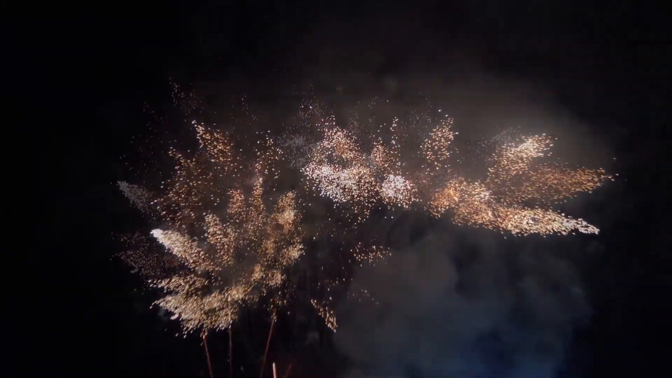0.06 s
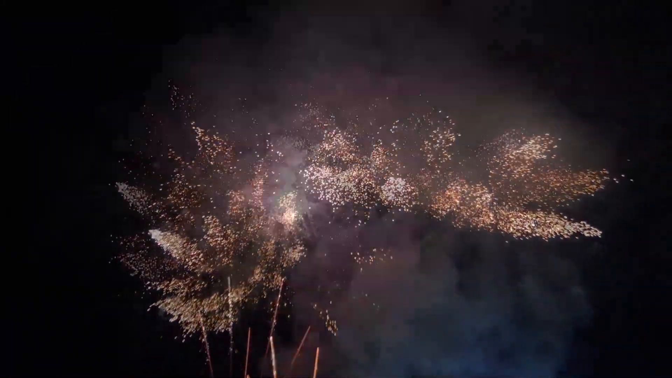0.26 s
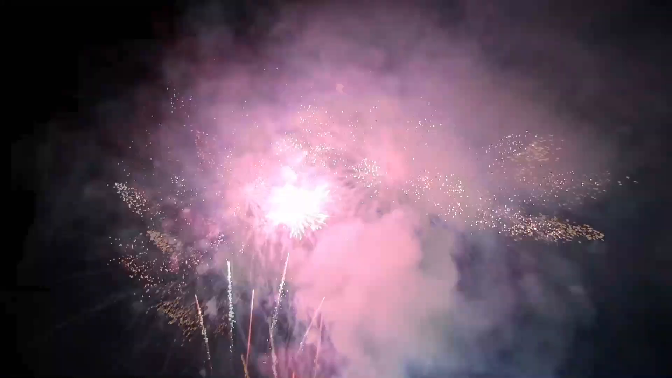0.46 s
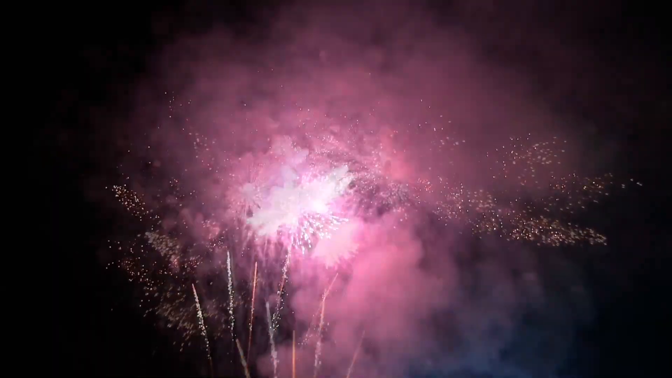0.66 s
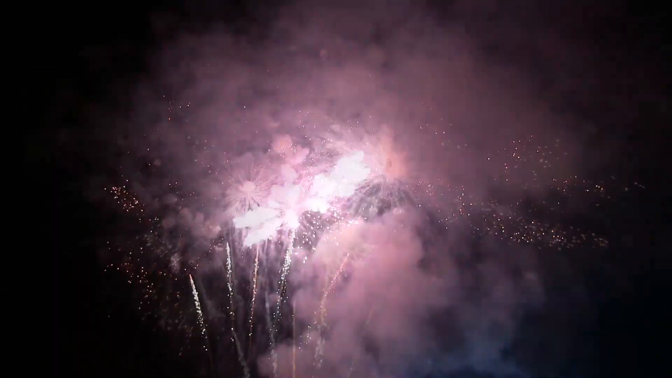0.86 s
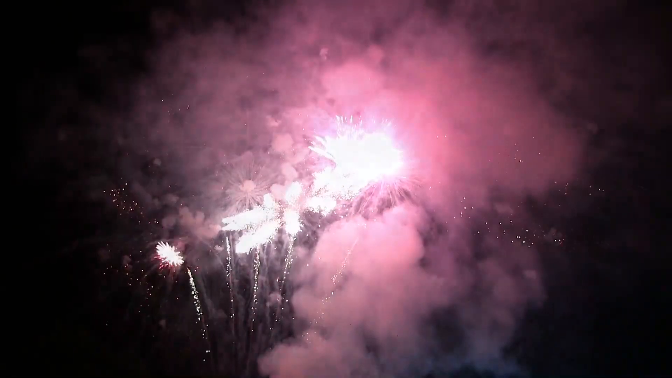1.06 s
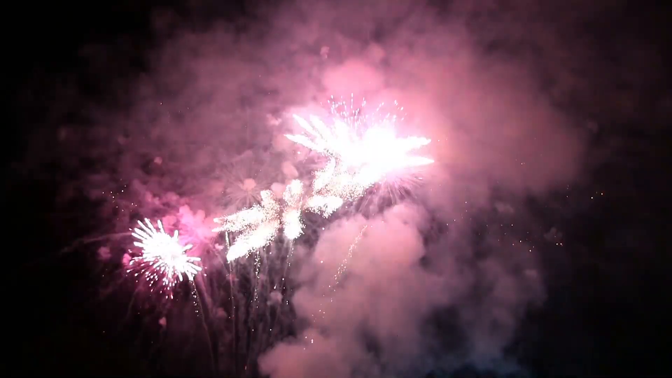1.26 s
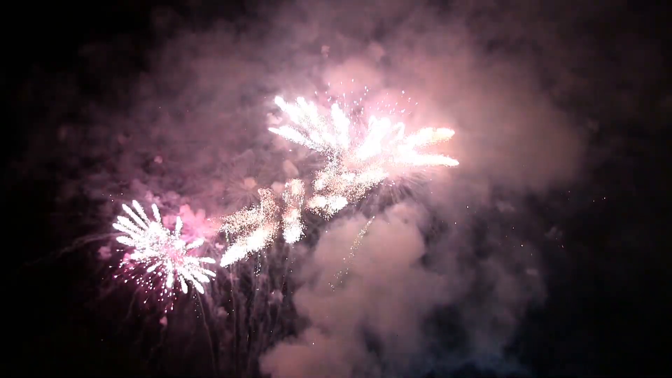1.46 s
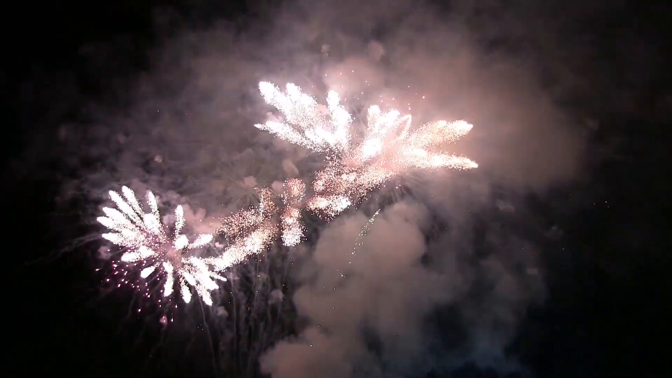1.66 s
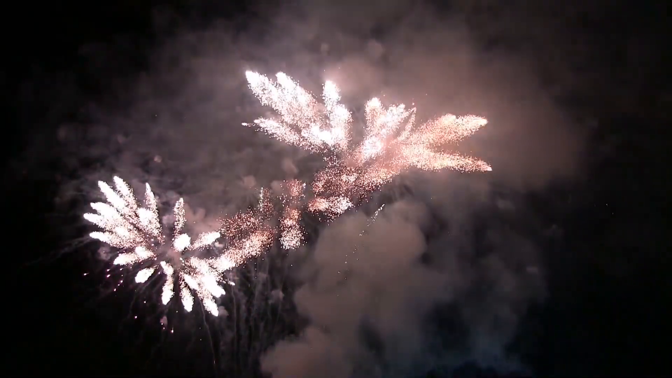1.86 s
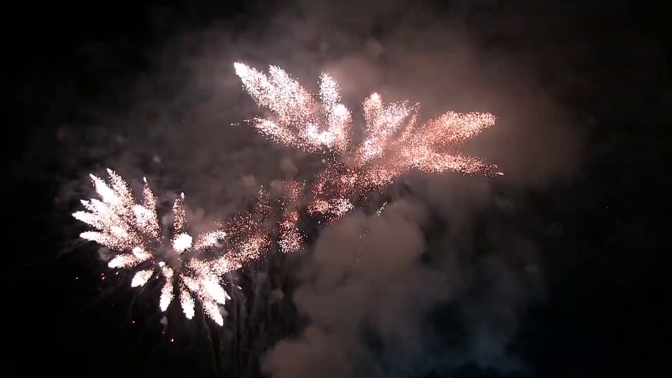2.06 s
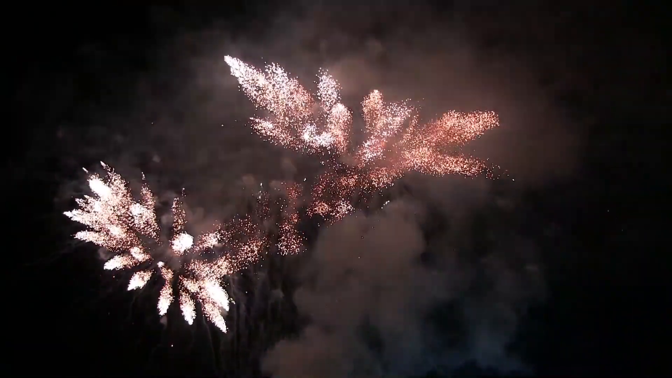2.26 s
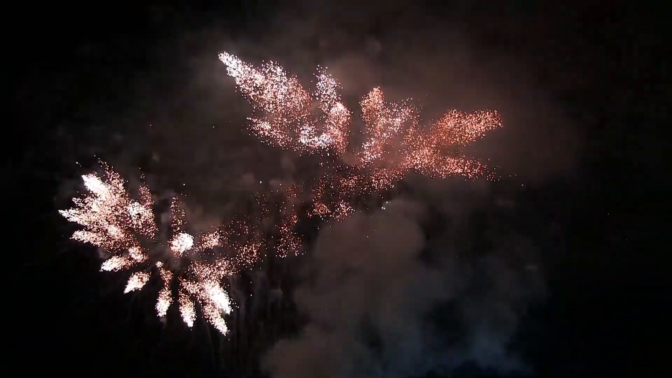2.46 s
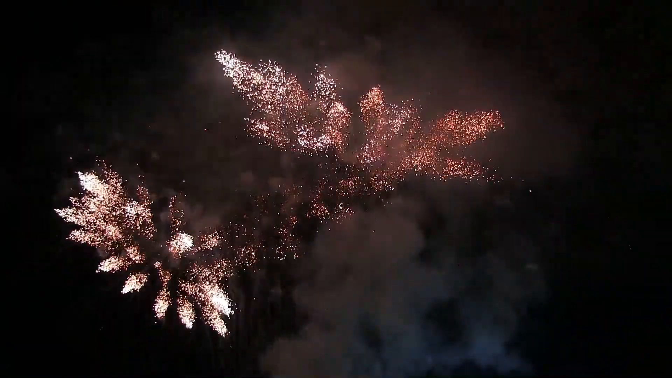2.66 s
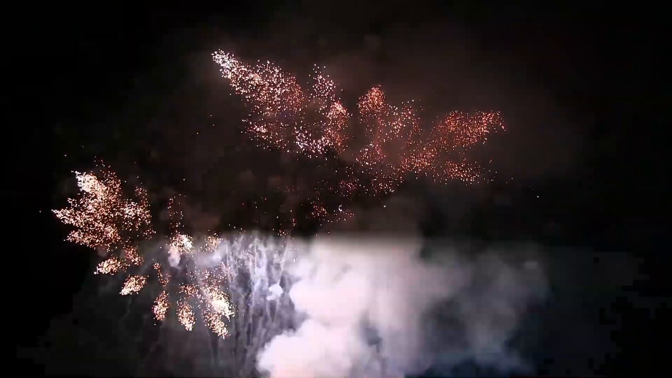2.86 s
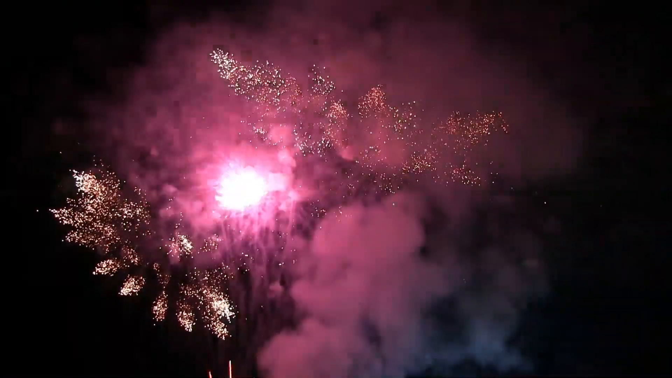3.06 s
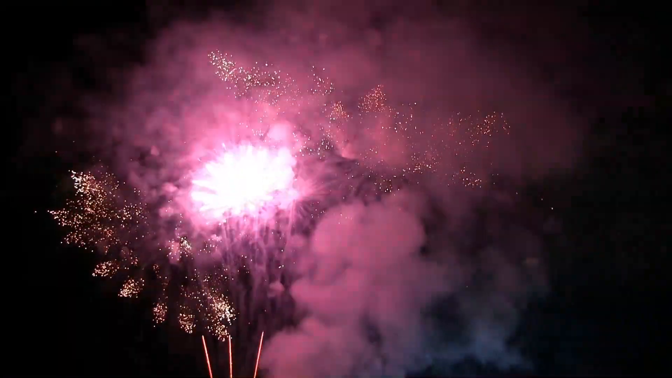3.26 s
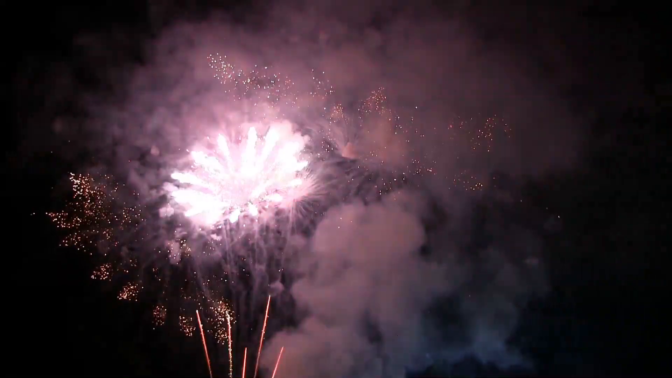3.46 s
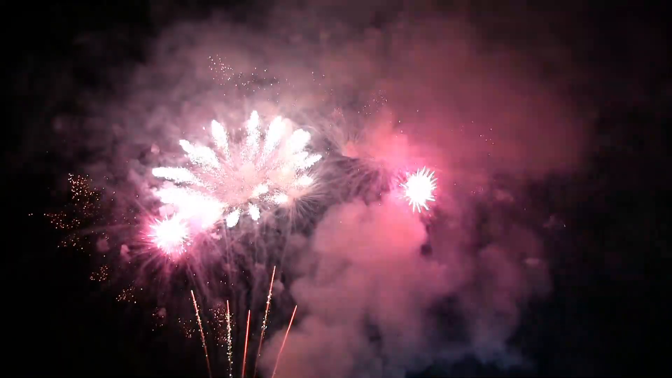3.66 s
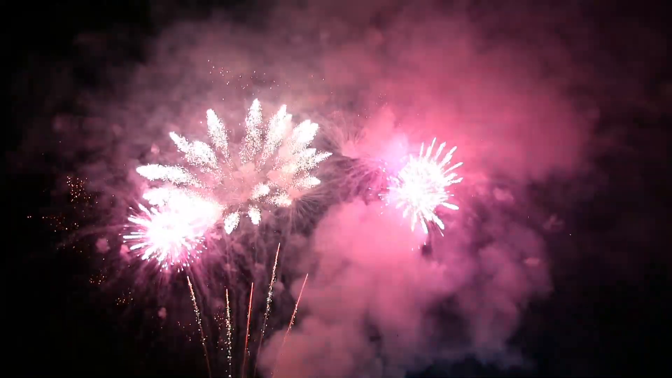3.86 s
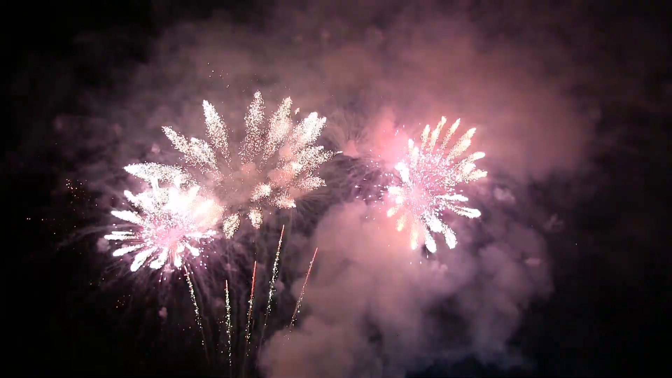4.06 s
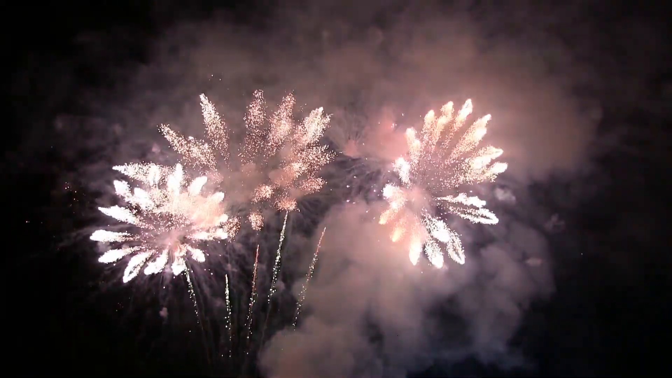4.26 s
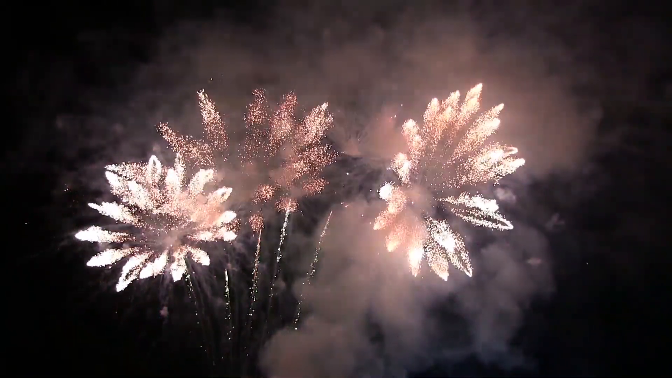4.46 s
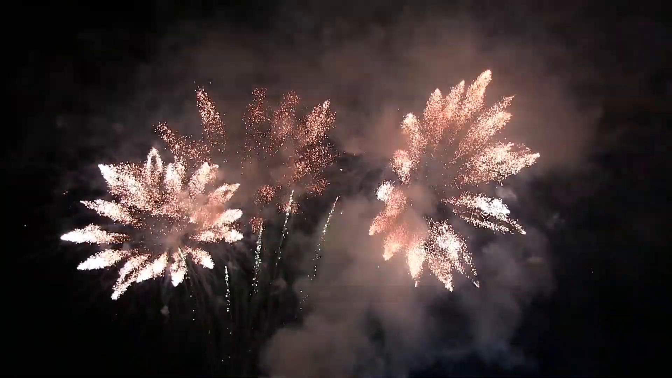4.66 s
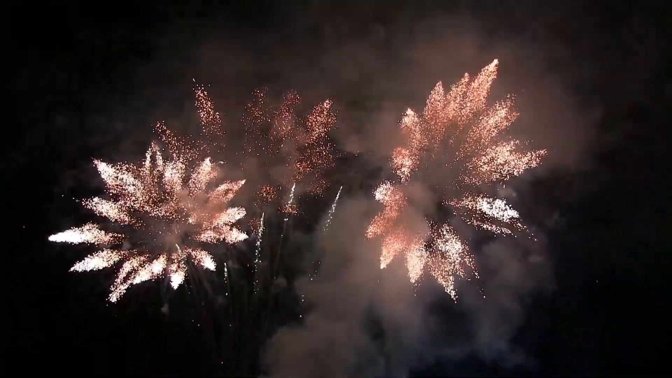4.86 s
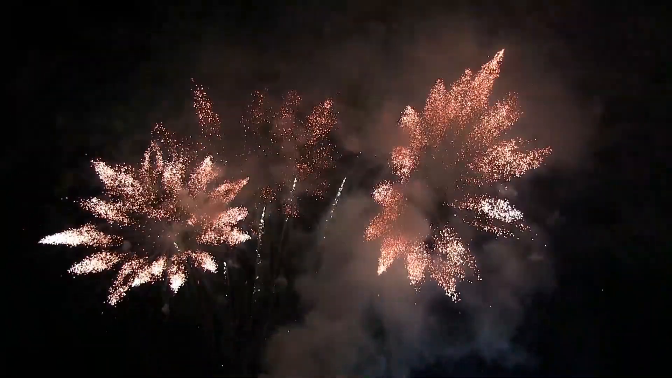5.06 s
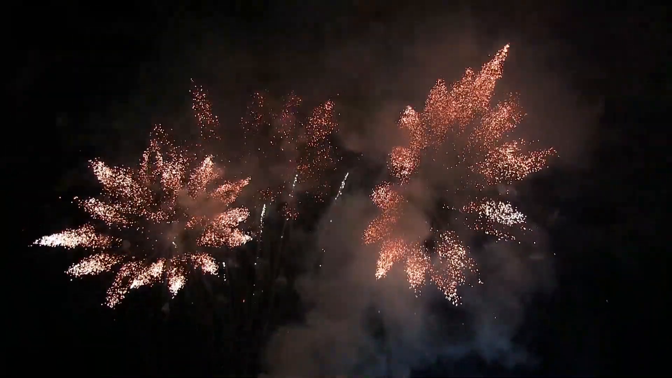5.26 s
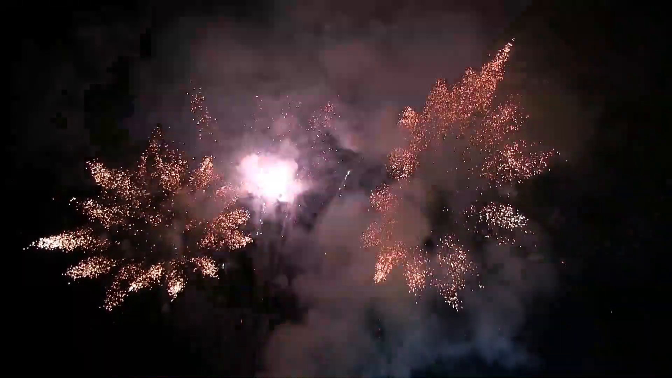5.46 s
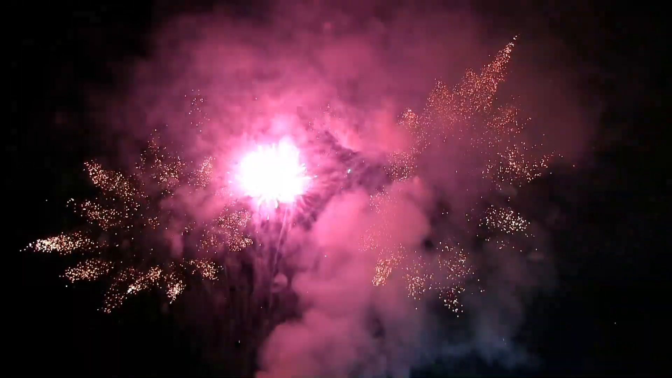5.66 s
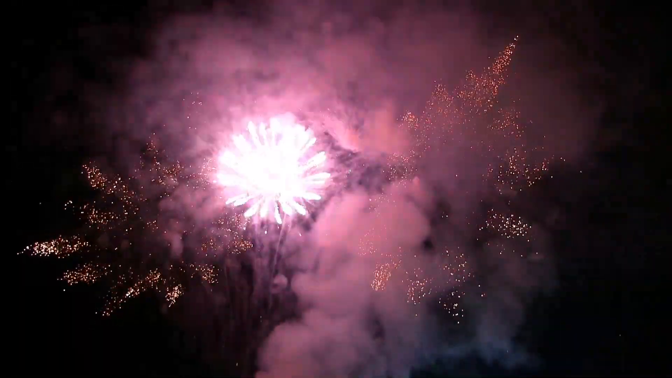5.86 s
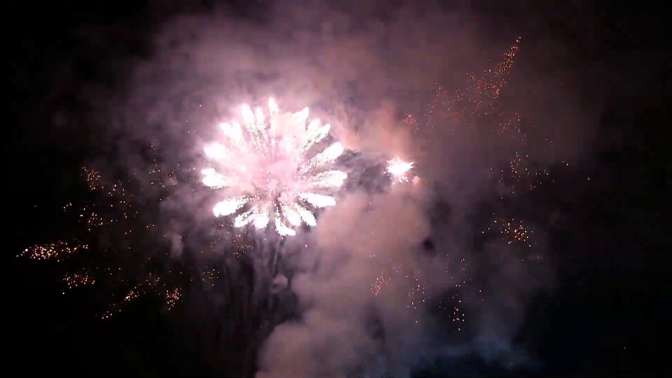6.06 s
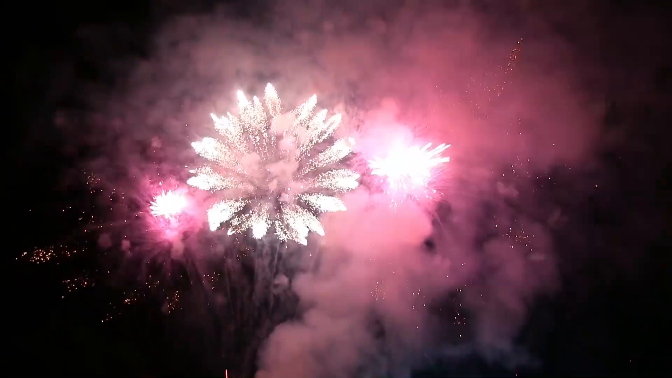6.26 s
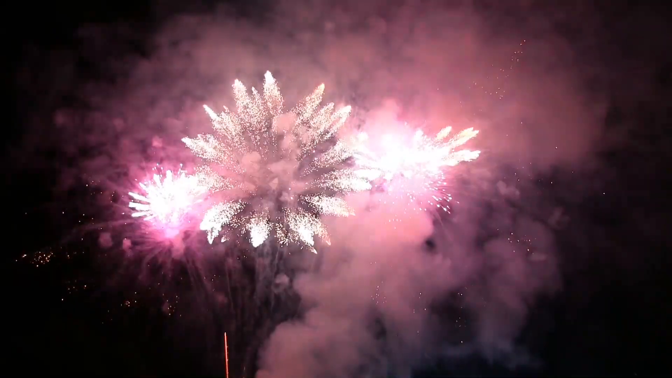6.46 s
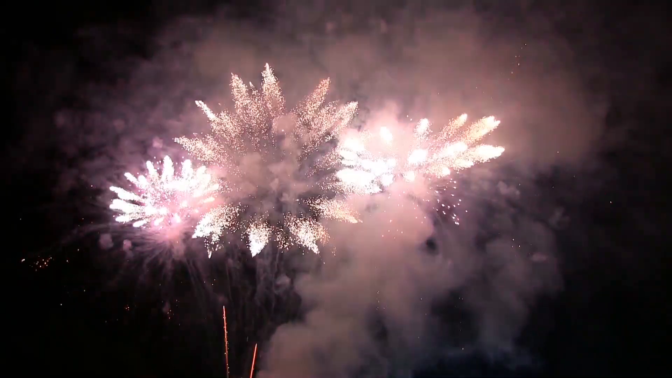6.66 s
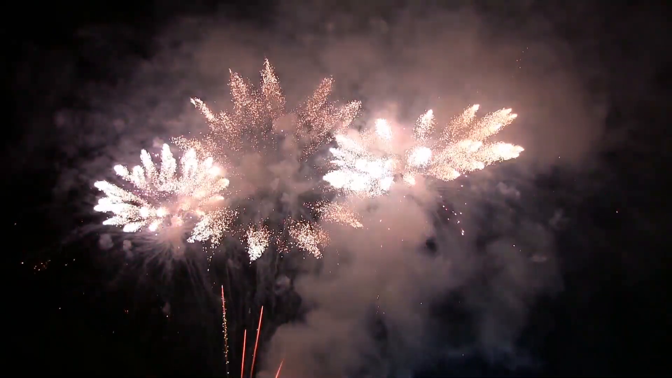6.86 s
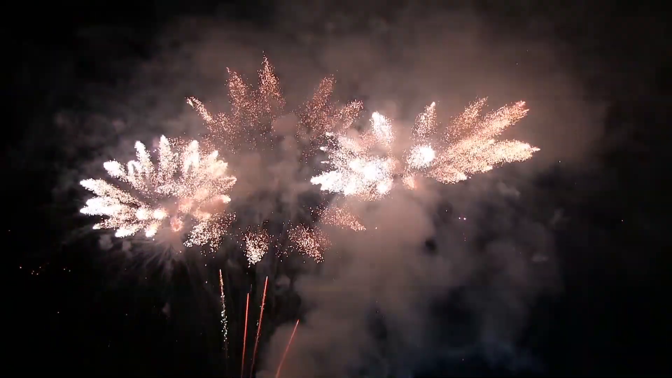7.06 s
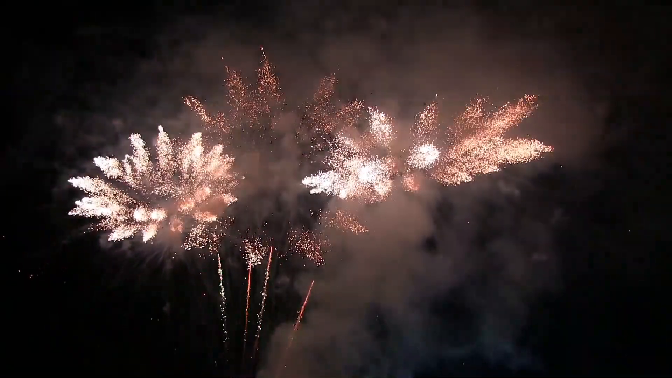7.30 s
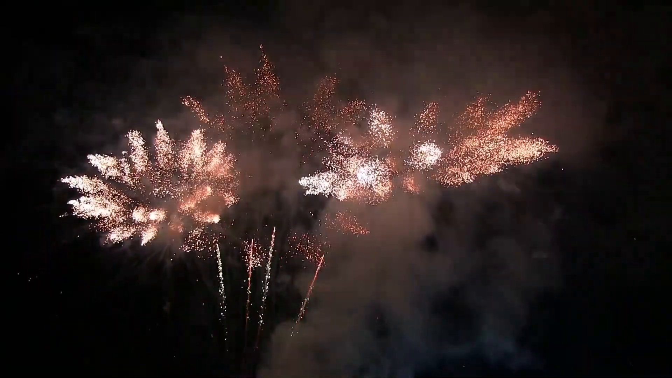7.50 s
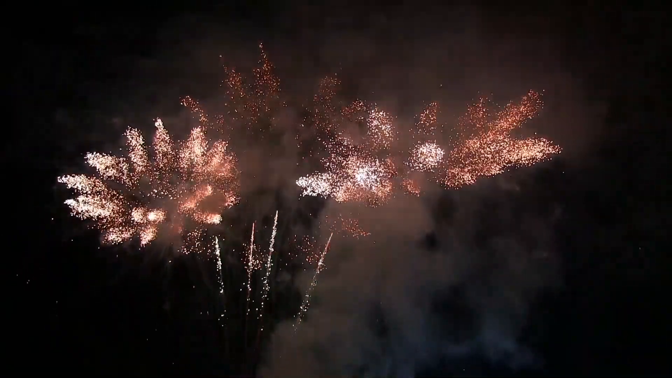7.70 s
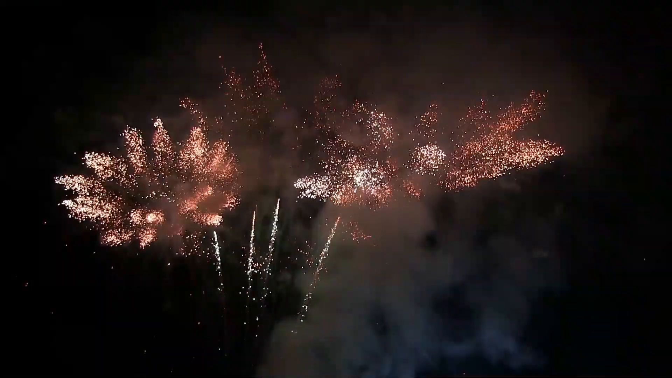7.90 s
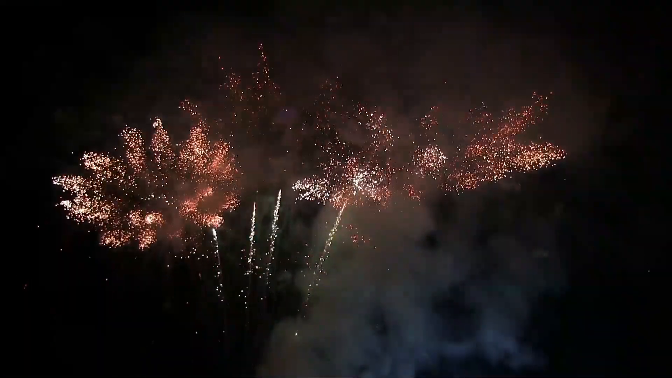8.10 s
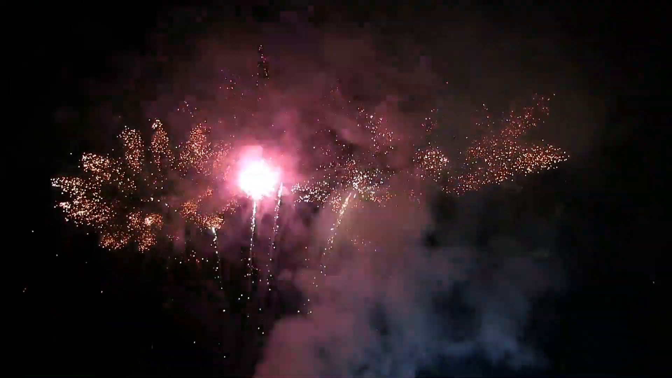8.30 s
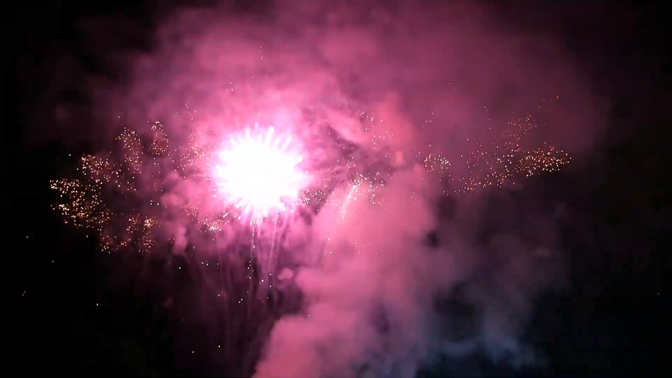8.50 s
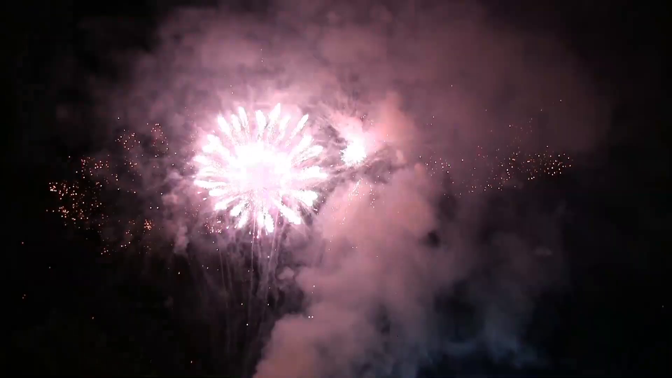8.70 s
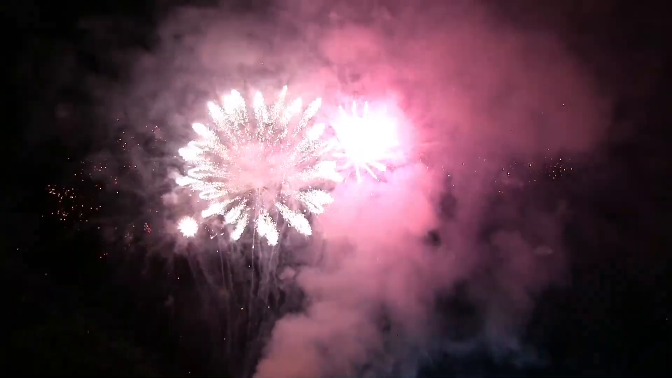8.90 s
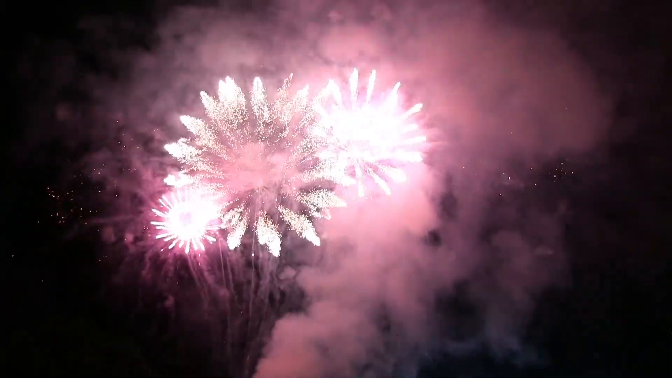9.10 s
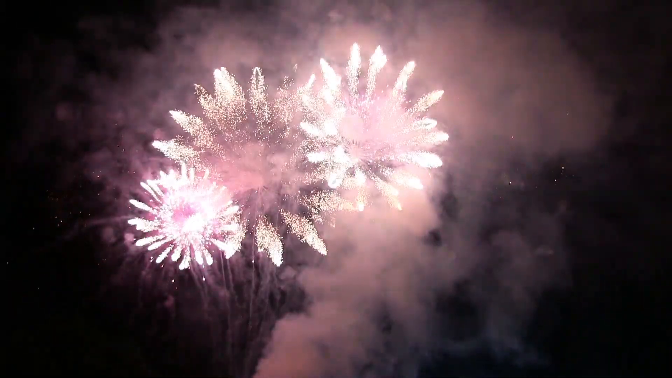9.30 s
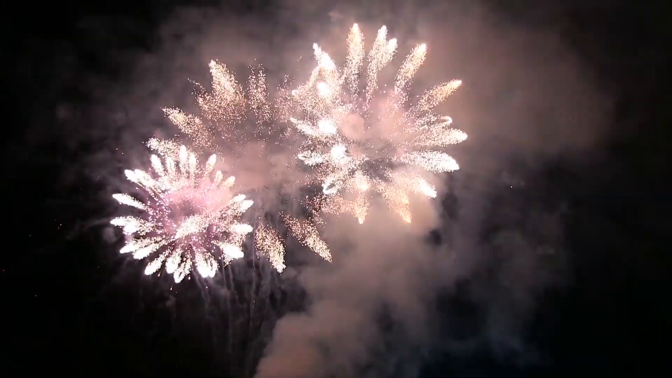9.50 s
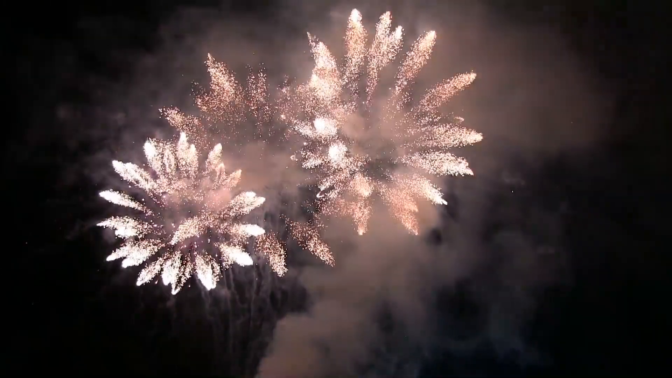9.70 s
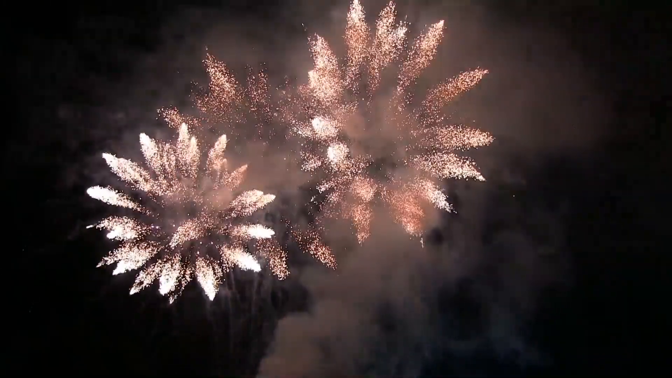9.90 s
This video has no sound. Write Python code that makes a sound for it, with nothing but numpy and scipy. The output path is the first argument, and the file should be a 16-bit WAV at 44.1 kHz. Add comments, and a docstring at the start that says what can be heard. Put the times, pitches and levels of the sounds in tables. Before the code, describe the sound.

Sharp firework bangs burst overhead in loose groups of two or three, each slapping off walls and rolling away over a town at night.

```python
"""Sharp firework bangs in volleys, each rolling away over a town, with faint pops and narrow hisses between.
Each blast is a pressure jump and suction, repeated off the ground, nearby walls and smaller facades.
Thuds come back from big buildings; the roll is banded noise under decaying envelopes.
Launch-tube pops are ringing cracks and resonant thumps; hisses are swelling bands of noise.
The camera's crossover filters smear every bang into a falling chirp."""
import sys
import numpy as np
from scipy import signal
from scipy.fft import rfft, irfft, next_fast_len
from scipy.io import wavfile
from scipy.ndimage import uniform_filter1d

SR = 44100
rng = np.random.default_rng(int(sys.argv[2]) if len(sys.argv) > 2 else 0)


def digitize_waveform(pressure):
    """Quantize a signal to 16-bit integers and store it at the path in sys.argv[1].

    Rows of a 2-D input are taken as channels; values are limited to [-1, 1].
    """
    field = np.atleast_2d(pressure).T
    bounded = np.clip(field, -1, 1)
    quanta = np.round(bounded * 32767).astype(np.int16)
    wavfile.write(sys.argv[1], SR, quanta)


N = 438354

# shell bursts: t/s, drive/dB, bearing/deg (positive right)
SHELLS = [(1.2329, 6, 3), (1.6850, 5, 13), (2.0276, 7.5, -12), (3.8645, 5.5, 1.5), (4.4723, 4.5, 13),
          (4.5798, 5, -10), (6.3969, 5.5, 4), (6.933, 4, 20.5), (7.1523, 6, -10), (9.1402, 6, 5),
          (9.5483, 5.5, 9.5), (9.8774, 5, -5)]

SIZE = next_fast_len(N + SR)  # zero-padded: filter tails do not wrap round
S = 1j * np.fft.rfftfreq(SIZE, 1 / SR)  # j times frequency in Hz
LR = np.array([[1], [-1]])  # left, right


def undb(db):
    """Amplitude ratio of a level in dB."""
    return 10 ** (np.asarray(db) / 20)


def through(x, response):
    """Filter x by a response given on the frequency axis S."""
    return irfft(rfft(x, SIZE) * response, SIZE)[..., :N]


def resonance(hz, width_hz):
    """Two-pole band-pass response, unity at its centre."""
    return S * width_hz / (S * S + S * width_hz + hz * hz)


def dull(x, hz):
    """Low-pass of two equal real poles."""
    pole = np.exp(-2 * np.pi * hz / SR)
    return signal.lfilter([(1 - pole) ** 2], [1, -2 * pole, pole ** 2], x)


def walk(rate_hz):
    """Random levels joined by straight slopes, rate_hz new ones a second; spread near 0.6."""
    hold = int(SR / rate_hz)
    steps = np.repeat(rng.standard_normal(N // hold + 1), hold)
    return 0.71 * uniform_filter1d(steps, hold)[:N]


def add(out, start_s, db, pan_db, wave, lag_ms=0):
    """Mix in a short wave; pan_db is left minus right, lag_ms how much later the left comes."""
    for channel, side in enumerate((1, -1)):
        i = min(int(round((start_s + side * lag_ms / 2000) * SR)), N)
        gain = undb(db + side * pan_db / 2)
        out[channel, i:i + len(wave)] += gain * wave[:max(N - i, 0)]


def blast(bright_hz=None, rough=0, thin=0, thin_hz=700, fade=2.0):
    """Overpressure falling through zero into suction; reflectors blur it, small ones lose the bass."""
    push_ms, suction = 6.64, 4.55  # overpressure length, damping per push
    u = np.arange(SR // 25) / SR * 1000 / push_ms  # time in pushes
    pressure = (1 - u) * np.exp(-suction * u)
    crackle = rough * rng.standard_normal(len(u)) * np.exp(-fade * u)
    wave = pressure + crackle
    if bright_hz is None:
        return wave
    return dull(wave, bright_hz) - thin * dull(wave, thin_hz)


def rolling_db(db, deg):
    """Level a burst feeds into the town; bursts to the right wake it more."""
    return db - 0.06 + 0.1943 * deg


def roll():
    """Countless small echoes: nearby ones rise fast and die soon, the town's swell later and rumble on."""
    # volley still rolling at the start: t/s, drive/dB, bearing/deg
    earlier = [(-1.12, 14.5, 0)]
    # echo bands: f/Hz, near level/dB, near t60/s, town level/dB, town t60/s, night floor/dB, L-R correlation
    # levels before swells; near and town levels also before the rise, relative to the burst's feed
    bands = [(34.8, -35, 0.55, -51, 1.6, -45, 0.91), (61.6, -26.5, 0.82, -32, 2.83, -50, 0.92),
             (111, -25.5, 0.45, -39.5, 2.5, -62, 1), (150, -29.5, 0.51, -34, 2.3, -52.5, .75),
             (344, -37, 0.18, -40, 2.3, -55.5, 0.32), (450, -26.5, 0.24, -39, 2.43, -56, 0.42),
             (648, -37, 0.45, -40.5, 2.52, -56.5, -0.3), (1010, -31, 0.45, -43, 2.4, -57, -0.32),
             (1770, -39.5, 0.77, -47, 2.94, -61.5, -0.022), (3270, -45, 0.86, -51, 2.58, -68.5, 0.018),
             (5150, -39.5, 0.58, -49.5, 2.3, -71.5, 0.0047), (7770, -48, 0.88, -66.5, 1, -78, -0.18),
             (9760, -51.5, 0.81, -54.5, 1.08, -78.5, 0.53), (12700, -57, 0.4, -70, 0.68, -99, 1),
             (15500, -70, .3, -92, .6, -105, .6)]
    lumpy_hz = 1200  # heavier swells below
    near_rise_ms, town_rise_ms = 12, 151
    bursts = [*earlier, *SHELLS]
    t = np.arange(0, N, 32) / SR
    since_s = np.clip([t - row[0] for row in bursts], 0, None)
    power = undb([[2 * rolling_db(db, deg)] for _, db, deg in bursts])
    noise = rfft(rng.standard_normal((2, SIZE)))
    # fractional band number of each frequency
    place = np.interp(np.log(S.imag + 1), np.log([row[0] for row in bands]), np.arange(len(bands)))
    arrivals_db = 2.64 * walk(60) + 0.55 * walk(13)  # groups of echoes land in all bands at once
    out = 0
    for k, (hz, near_db, near_t60, town_db, town_t60, floor_db, like) in enumerate(bands):
        near_rise = (1 - np.exp(-since_s * 1000 / near_rise_ms)) ** 2
        town_rise = (1 - np.exp(-since_s * 1000 / town_rise_ms)) ** 2
        near = near_rise * undb(2 * (near_db - 60 * since_s / near_t60))
        town = town_rise * undb(2 * (town_db - 60 * since_s / town_t60))
        envelope = np.sqrt(np.sum(power * (near + town), axis=0) + undb(2 * floor_db))
        crossfade = np.cos(np.pi / 2 * np.clip(place - k, -1, 1))
        band = irfft(noise * crossfade / (S.imag + 30), SIZE)[:, :N]
        mid, side = band / band.std() * np.sqrt((1 + np.clip(like, -1, 1) * LR) / 2)
        if hz < lumpy_hz:
            swells_db = arrivals_db + 1.52 * walk(9)
        else:
            swells_db = 0.85 * arrivals_db + 0.38 * walk(4.6)
        gain = np.interp(np.arange(N) / SR, t, envelope) * undb(swells_db)
        out = out + gain * (mid + LR * side)
    return out


def town_walls(count=45):
    """Big buildings further off send back separate dull thuds, weaker with distance."""
    first_db, t60_s = -20, 4.24
    out = np.zeros((2, N))
    thud = blast(1190, rough=0.86, thin=0.7, thin_hz=201)
    for s, db, deg in SHELLS:
        for place, size, side in rng.random((count, 3)):
            late_s = .12 + 1.6 * place ** 1.4
            thud_db = rolling_db(db, deg) + first_db - 60 * late_s / t60_s - 12 * size
            add(out, s + late_s, thud_db, 5 * (side - .5), thud, side - .5)
    return out


def block(count=9):
    """A block of buildings: close-packed thuds swell about a fifth of a second after each burst."""
    delay_s, spread_s, level_db = .22, .03, -24
    out = np.zeros((2, N))
    for s, db, deg in SHELLS:
        for late, size, side in rng.standard_normal((count, 3)):
            thud = blast(1400, rough=1.0, thin=0.5, thin_hz=250)
            thud_db = rolling_db(db, deg) + level_db + 1.6 * size
            add(out, s + delay_s + spread_s * late, thud_db, 1.5 * side, thud, 0.27 * side)
    return out


def hiss():
    """Faint narrow bands of noise that swell and fade, perhaps stars on their way up."""
    # from/s, to/s, f/Hz, width of each of two cascaded resonances/Hz, level before swell and flutter/dB
    hisses = [(5.926, 6.382, 5850, 900, -68), (9.053, 9.157, 2350, 70, -62)]
    out, t = 0, np.arange(N) / SR
    for start, end, hz, width_hz, db in hisses:
        swell = np.sin(np.pi * np.clip((t - start) / (end - start), 0, 1)) ** 0.64
        flutter = undb(2.8 * walk(36))
        band = through(rng.standard_normal((2, N)), resonance(hz, width_hz) ** 2)
        out = out + undb(db) * swell * flutter * band / band.std()
    return out


def pops(count=15):
    """Far launch tubes: crack of gas, dull thump, thin slap off a wall; fainter ones come at random."""
    # t/s, crack drive/dB, thump drive/dB, crack left minus right/dB
    timed = [(0.0407, -49.5, -42, -17), (0.3705, -58, -28, -12), (0.561, -54, -24, -4),
             (0.604, -46, -34, -5), (0.7786, -42.5, -25.5, -3.0), (0.9716, -48, -30.5, -10.5),
             (2.441, -42, -24, -1.5), (2.461, -37, -26, -8), (3.685, -49, -29, -1), (3.709, -53, -34, 4),
             (3.7288, -58, -24.5, -1), (4.2301, -53, -11, -2.5), (4.3033, -51, -18.5, 15),
             (4.442, -42, -19, -10), (4.8994, -52, -9.5, -1.5), (4.9603, -48, -14.5, -21),
             (5.1192, -36, -17.5, -7), (6.843, -56, -41, 4.0), (6.8917, -53, -11.5, 1.0),
             (7.6253, -68, -10.5, -8), (7.643, -45, -16, -14), (7.846, -36, -17.5, -4),
             (8.3401, -47.5, -31, 5), (9.4959, -55, -12, 2), (9.716, -34, -40, -5)]
    # crack resonances: f/Hz, width of each of two cascaded/Hz, relative level/dB
    modes = [(1860, 1500, 7.5), (4270, 1500, -2.5)]
    crack_ms, echo_ms, echo_db = 11, 46, -9.5
    faint_crack_db, faint_thump_db, spread_db = -54, -50, 8
    cracks, thumps = np.zeros((2, 2, N))
    ms = np.arange(SR // 20) / SR * 1000
    faint = []
    for when, crack, thump, side in rng.random((count, 4)):
        crack_db = faint_crack_db + spread_db * (crack - .5)
        thump_db = faint_thump_db + spread_db * (thump - .5)
        faint.append((when * N / SR, crack_db, thump_db, spread_db * (side - .5)))
    for s, db, thump_db, pan_db in [*timed, *faint]:
        puff = np.exp(-ms / crack_ms) * (1 - np.exp(-ms / 0.5))
        first, echo = rng.standard_normal((2, len(ms))) * puff
        add(cracks, s, db, pan_db, first, .2)
        add(cracks, s + echo_ms / 1000, db + echo_db, -pan_db, echo - 0.95 * dull(echo, 3000))
        add(thumps, s, thump_db, 0, blast(1400, rough=.3))
    ring = sum(undb(db) * resonance(hz, width_hz) ** 2 for hz, width_hz, db in modes)
    ring = ring / (1 + (S.imag / 6500) ** 4)
    return undb(10.0) * through(cracks, ring) + undb(3.5) * through(thumps, resonance(363, 340))


def wall(deg, longest_ms, facing_deg, db, db_per_deg, edge_deg):
    """Flat wall's echo delay/s, longest at facing_deg, and level/dB, constant beyond edge_deg."""
    delay_s = longest_ms / 1000 * np.cos(np.radians(deg - facing_deg))
    return delay_s, db + db_per_deg * min(deg, edge_deg)


def shells():
    """Each burst with ground bounce and standout echoes; wall delays and levels shift with bearing."""
    # weaker reflectors: mean delay/ms, mean level re burst/dB, left minus right/dB, first low-pass f/Hz
    facades = [(25.95, -27, 6, 9600), (33.2, -24, -1, 3600), (37.7, -21.5, 2.5, 7700), (43.7, -17, 7, 8600),
               (59.9, -20, -8, 8000), (79.1, -12, 1, 2700)]
    port_lag_ms, pan_db_per_deg = .35, 0.17  # right bursts: later yet louder on the left
    ground_ms, ground_db = 3.0, -9
    out = np.zeros((2, N))
    for s, db, deg in SHELLS:
        lag_ms, pan_db = port_lag_ms * np.sin(np.radians(deg)), pan_db_per_deg * deg
        near_s, near_db = wall(deg, longest_ms=22.5, facing_deg=21.5, db=-2.5, db_per_deg=1.5, edge_deg=0)
        far_s, far_db = wall(deg, longest_ms=66.5, facing_deg=0, db=-7.5, db_per_deg=-0.11, edge_deg=24)
        side_s, side_db = wall(deg, longest_ms=96, facing_deg=0, db=-18, db_per_deg=-.9, edge_deg=5)

        direct = blast(rough=0.074, fade=2.7)
        ground = blast(9500, rough=0.29, thin=0.9, fade=3.4)
        near = blast(3500, rough=0.092, thin=0.37, thin_hz=248)
        far = blast(7000, rough=0.29, thin=0.8, thin_hz=470, fade=1.2)
        side = blast(2420, rough=0.11)
        add(out, s, db, pan_db, direct, lag_ms)
        add(out, s + ground_ms / 1000, db + ground_db, pan_db, ground, lag_ms)
        add(out, s + near_s, db + near_db, 0, near, -.1)
        add(out, s + far_s, db + far_db, 5, far, -.1)
        add(out, s + side_s, db + side_db, -5.5, side, .1)

        for ms, echo_db, echo_pan_db, hz in facades:
            late, loud, lag = rng.standard_normal(3)
            wave = dull(blast(hz, rough=0.66, thin=0.65, fade=3.6), 10000)
            add(out, s + (ms + .8 * late) / 1000, db + echo_db + 1.9 * loud, echo_pan_db, wave, .3 * lag)
    return out


def scene():
    """Sum of all layers, background first."""
    return roll() + town_walls() + block() + hiss() + pops() + shells()


def record(dry):
    """Camera: bass cut, dull treble, port notches; crossover all-passes make lows trail the crack."""
    # all-pass centres: f/Hz
    crossover_hz = [76.5, 133, 265, 1200, 4500, 7000, 7000]
    # port notches: f/Hz, width/Hz, gain at centre/dB (positive is a slight peak)
    notches = [(4860, 220, 0.5), (7440, 140, -4)]
    bass_hz, bass_q = 98.9, 1.256
    shelf_from_hz, shelf_to_hz = 2310, 5320
    air_hz, top_hz = 13400, 16200
    bass_cut = S * S / (S * S + S * bass_hz / bass_q + bass_hz ** 2)
    shelf = (1 + S / shelf_to_hz) / (1 + S / shelf_from_hz)
    response = bass_cut * shelf / (1 + (S.imag / air_hz) ** 8)
    for hz in crossover_hz:
        response = response * (1 - 2 * resonance(hz, np.sqrt(2) * hz))
    for hz, width_hz, db in notches:
        response = response * (1 - (1 - undb(db)) * resonance(hz, width_hz))
    top_cut = signal.ellip(8, .2, 70, top_hz, fs=SR, output="sos")
    return signal.sosfilt(top_cut, through(dry, response))


dry = scene()
out = record(dry)
digitize_waveform(out)
```